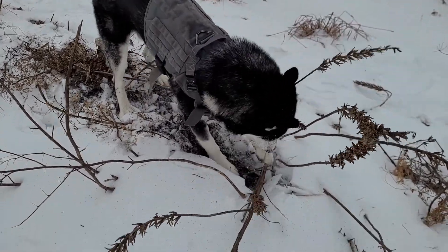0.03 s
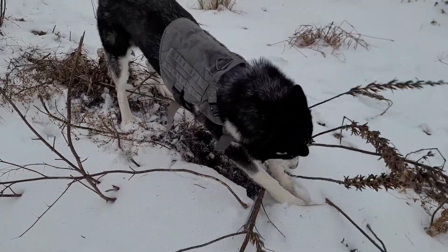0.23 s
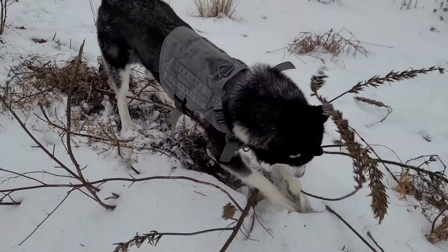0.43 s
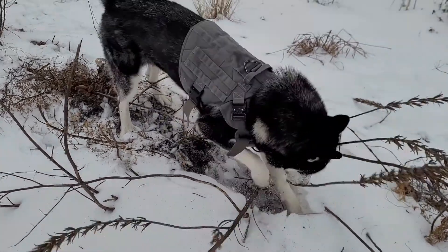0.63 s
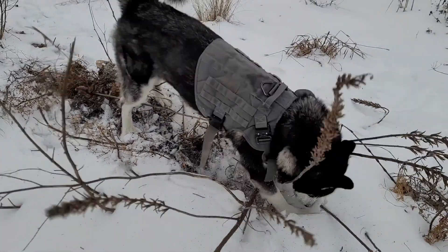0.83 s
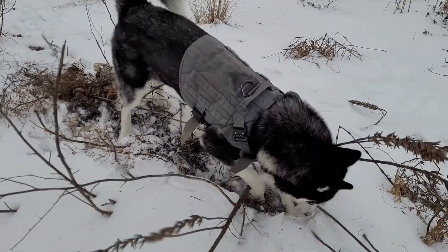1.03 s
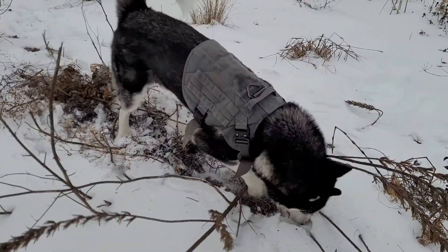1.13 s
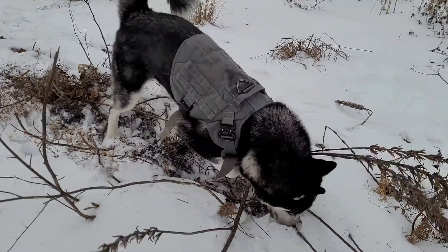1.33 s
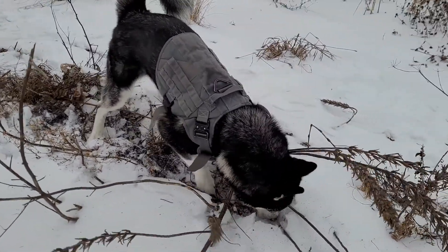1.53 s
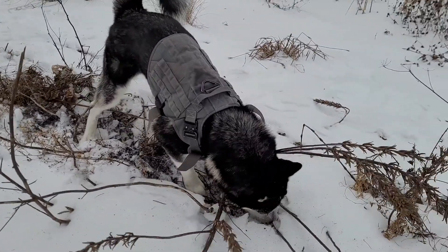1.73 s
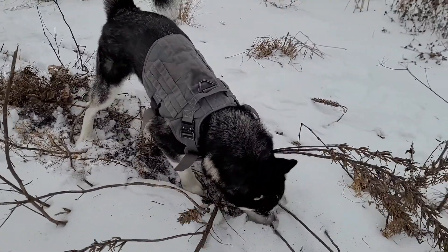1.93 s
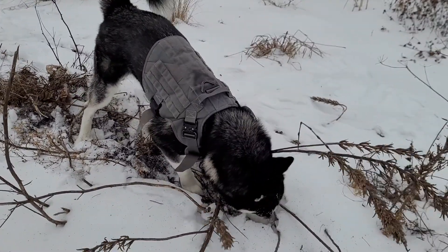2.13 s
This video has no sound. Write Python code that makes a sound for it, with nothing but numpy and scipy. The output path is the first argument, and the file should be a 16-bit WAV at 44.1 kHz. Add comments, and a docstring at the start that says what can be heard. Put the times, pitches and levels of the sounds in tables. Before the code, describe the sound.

Crisp, icy crunching comes in uneven bursts as a dog paws at snow outdoors, heard up close. Dry stems crack and paws thump dully, before it fades to a few quiet rustles above a low background rumble.

```python
"""Close, icy crunching: a dog in a padded coat digs and roots in crusted snow among dry stems.
Each paw stroke fractures a swarm of ice grains and compacts the snow beneath. Stems crack, lumps of
crust collapse, and the paws thud as their impacts excite damped vibrations in the snow and ground.
The digging dies down to soft nosing over a low, distant outdoor rumble."""
import sys
import numpy as np
from scipy import signal
from scipy.fft import rfft, irfft, next_fast_len
from scipy.io import wavfile

SR = 44100
rng = np.random.default_rng(int(sys.argv[2]) if len(sys.argv) > 2 else 0)


def wrap_up_sound(samples):
    """Save the sound to the file named by the first command line argument, as 16-bit audio."""
    columns = np.atleast_2d(samples).T
    # keep every value between -1 and 1, then stretch to whole-number steps
    tamed = np.clip(columns, -1, 1)
    steps = np.round(tamed * 32767).astype(np.int16)
    wavfile.write(sys.argv[1], SR, steps)


N = 97020

# Each row: time in seconds, relative level of the crunch in dB, relative level of the icy treble in dB.
DIG_EFFORT = [(0, -73, -62), (0.087, -74.5, -72), (0.117, -63.5, -52.5), (0.134, -49.5, -42),
              (0.218, -50.5, -45.5), (0.337, -53, -45), (0.36, -62.5, -62), (0.405, -64, -57),
              (0.43, -50, -44), (0.452, -53.5, -53), (0.465, -45.5, -41), (0.499, -46, -41),
              (0.539, -41, -34), (0.6, -53, -46.5), (0.665, -56, -52), (0.729, -44, -40.5),
              (0.788, -48.5, -43.5), (0.901, -58, -52), (0.947, -62, -57), (0.965, -52, -48.5),
              (1.004, -55, -49), (1.035, -39, -34), (1.075, -47.5, -42.5), (1.14, -60.5, -50),
              (1.246, -59.5, -53), (1.272, -62.5, -57.5), (1.41, -61.5, -56.5), (1.48, -71, -65.5),
              (1.532, -68, -60), (1.608, -65, -62.5), (1.665, -76.5, -70), (1.71, -88, -74.5),
              (1.928, -93, -82), (1.965, -66.5, -58), (2.001, -67.5, -54.5), (2.08, -76, -77),
              (2.138, -86.5, -70), (2.2, -101.5, -86.5)]
# Spectra of crust, ice, packing snow and ground. Each row: frequency in Hz, relative gain in dB.
CRUST_SPECTRUM = [(300, -24.5), (650, -7), (1100, -0.5), (1800, -4), (2700, -3), (3700, -5.5), (4700, -2),
                  (6200, -4), (9000, -25.5)]
ICE_SPECTRUM = [(3000, -33), (5000, -6.5), (6300, -2), (7700, -3.5), (8900, -8), (10200, -3.5), (11700, 1),
                (13700, 1), (15500, 1)]
PACK_SPECTRUM = [(70, -16.5), (120, -5.5), (165, -9.5), (220, 4.5), (350, 0.5), (520, 0.5), (780, -7.5),
                 (1200, -12), (2500, -33)]
GROUND_SPECTRUM = [(20, -41.5), (38, -9.5), (56, 3), (85, -2.5), (120, -1.5), (200, -17.5), (600, -54.5)]
def digging(grains_per_s=2000, grains_follow=.35, pack_follows=.74, ground_follows=.33):
    """Brittle fracture of the crust gives the crackle; compaction and ground vibration give the body."""
    times, *levels = np.transpose(DIG_EFFORT)
    crunch_db, ice_db = [np.interp(seconds(), times, level) for level in levels]
    rate = grains_per_s * from_db(grains_follow * (ice_db - ice_db.mean()))  # more force, more grains
    crust = grains(rate, spread_db=2, grain_s=.00067, clump_db=2.94, clumps_per_s=200, bed=.3, alike=.25)
    packing = grains(700, spread_db=1.5, grain_s=.0018, clump_db=2, clumps_per_s=76, bed=.3, alike=.95)
    crunch = from_db(5 + crunch_db) * shaped(crust, CRUST_SPECTRUM)
    ice = from_db(4 + ice_db) * shaped(crust, ICE_SPECTRUM)
    # Snow and ground follow only a share of the crunch's swing in level.
    snow = from_db(-10.5 + pack_follows * crunch_db) * shaped(packing, PACK_SPECTRUM)
    ground = from_db(-37 + ground_follows * crunch_db) * shaped(noise(.97), GROUND_SPECTRUM)
    return crunch + ice, snow + ground


# Each row: start in seconds, relative level in dB, offset of the woody midrange in dB.
STEM_BREAKS = [(0.1689, -27, 2), (0.189, -25, -9), (0.211, -21, -33), (0.223, -26.5, -2.5),
               (0.3424, -28.5, -2), (0.3716, -23, -8.5), (0.4406, -17, -37), (0.4548, -12, -15),
               (0.735, -19, -6.5), (0.7657, -20.5, -10), (1.0654, -10.5, -12), (1.175, -22.5, -45),
               (1.2275, -28, -17), (1.506, -32, -32), (2.037, -39.5, -26)]
# Spectra of the bright crack and the woody midrange. Each row: frequency in Hz, relative gain in dB.
CRACK_SPECTRUM = [(800, -34), (2500, -15), (5000, -1.5), (8000, -10), (11500, 4), (15500, 0)]
WOOD_SPECTRUM = [(400, -7), (900, -1.5), (1500, -3), (2000, -4), (2800, 1.5), (3600, -5.5), (4900, -2.5),
                 (8000, -16.5)]
def stem_snaps(delay_s=.0013, splinter_decay_s=.0006, splinter_db=-6):
    """Sudden release of bending stress: a dry stem radiates one impulse and a spray of splinters."""
    bright, woody = np.zeros((2, 2, N))
    age = np.arange(SR // 50) / SR
    for start, db, wood_db in STEM_BREAKS:
        crack = rng.standard_normal((2, len(age))) * np.exp(-age / splinter_decay_s)
        crack *= from_db(splinter_db) / np.linalg.norm(crack[0])
        crack[:, 0] += [1, .5]  # the impulse faces the left microphone
        i = int((start + delay_s) * SR)
        bright[:, i:i + len(age)] += from_db(db + 9) * crack
        woody[:, i:i + len(age)] += from_db(db + wood_db + 11) * crack
    return shaped(bright, CRACK_SPECTRUM) + shaped(woody, WOOD_SPECTRUM)


# Each row is a lump of crust collapsing or a dull knock or crack of a woody stem. Each row: start in seconds,
# relative level in dB, offset of the woody midrange in dB, width in seconds.
CRACK_RUNS = [(0.1223, -27.5, -9, 0.0053), (0.5315, -18, -16, 0.0049), (0.959, -40, -7.5, 0.0035),
              (1.0211, -18.5, -15.5, 0.0041), (1.0373, -14.5, -19, 0.0045), (1.0455, -20, -14, 0.0046),
              (1.0574, -11, -15.5, 0.0036), (1.383, -28.5, -19.5, 0.0037), (1.45, -38, -17.5, 0.0038),
              (1.5185, -26, -29, 0.0041), (1.5268, -32.5, -22, 0.006)]
def crack_runs():
    """Cascading fracture: a lump of crust gives way, or a woody stem knocks and cracks, in a run of cracks that
    swells and dies quickly."""
    bright, woody = np.zeros((2, N))
    for start, db, wood_db, width in CRACK_RUNS:
        rise = np.maximum(seconds() - start, 0) / (width / 2)
        swell = rise ** 2 * np.exp(2 * (1 - rise))  # peaks half a width after the start
        bright += from_db(db - 6.5) * swell
        woody += from_db(db + wood_db + 6.5) * swell
    run = grains(6500, spread_db=4, grain_s=.00024, clump_db=3.5, clumps_per_s=500, bed=.2, alike=.81)
    return shaped(bright * run, ICE_SPECTRUM) + shaped(woody * run, WOOD_SPECTRUM)


# Each row: start in seconds, relative level in dB, pitch in Hz.
PAW_STRIKES = [(0.209, -26, 493), (0.22, -26, 245), (0.284, -26, 556), (0.461, -32, 246), (0.479, -24, 247),
               (0.509, -27.5, 221), (0.542, -23, 358), (0.582, -33.5, 275), (0.73, -32, 288),
               (0.761, -23.5, 474), (0.956, -35, 291), (1.021, -23, 817), (1.034, -18.5, 444),
               (1.045, -16, 509), (1.102, -29, 366), (1.224, -39.5, 272), (1.378, -32, 711)]
def paw_thuds(t60_cycles=17.72, rise_s=.0019, grit_db=-6):
    """Damped resonance: each paw sets the packed snow ringing for a few gritty cycles."""
    out, hiss = np.zeros((2, N)), noise(.87)
    for start, db, hz in PAW_STRIKES:
        age = np.maximum(seconds() - start, 0)
        attack = 1 - np.exp(-(age / rise_s) ** 2)
        decay = from_db(db - 2.5 - 60 * age * hz / t60_cycles)
        band = signal.butter(2, [.71 * hz, 2.13 * hz], "band", fs=SR, output="sos")
        grit = from_db(grit_db) * rms_one(signal.sosfilt(band, hiss))
        out += attack * decay * (np.sin(2 * np.pi * hz * age) + grit)
    return out


# Each row: start in seconds, level in dB, pitch in Hz.
WEIGHT_LANDINGS = [(0.953, -44.5, 60), (1.024, -33.5, 110), (1.066, -37.5, 52), (1.521, -57, 58),
                   (2.081, -46.5, 57)]
def stomps(t60_s=.14):
    """Impact excitation: the dog's weight lands and starts a deep, exponentially decaying tone."""
    out = np.zeros(N)
    for start, db, hz in WEIGHT_LANDINGS:
        age = np.maximum(seconds() - start, 0)
        out += from_db(db - 60 * age / t60_s) * np.sin(2 * np.pi * hz * age)
    return out


def scatter(x, decay_s=.012, level_db=-11):
    """Diffuse reflection: snow and brush return a faint, very short tail."""
    age = np.arange(SR // 10) / SR
    tail = rng.standard_normal((2, len(age))) * np.exp(-age / decay_s)
    return from_db(level_db) * signal.fftconvolve(x, tail / np.linalg.norm(tail[0]), axes=1)[:, :N]


# Each row: frequency in Hz, relative gain in dB.
RUMBLE_SPECTRUM = [(20, -23.5), (38, -16), (54, 5.5), (85, -10), (115, -5.5), (190, -14), (350, -8.5),
                   (480, -10), (750, -20), (1300, -42), (2000, -55.5), (15000, -43.5)]
def distant_rumble():
    """Stationary noise with its power at low frequencies is heard as a steady rumble."""
    return from_db(-58.5) * shaped(noise(.53), RUMBLE_SPECTRUM)


def grains(per_s, spread_db, grain_s, clump_db, clumps_per_s, bed, alike):
    """Shot noise: tiny random fractures, each a dying burst, add in energy over a bed of friction."""
    sizes = from_db(spread_db * np.minimum(rng.exponential(1, N), 3.5) + clump_db * drift(clumps_per_s))
    born = rng.random(N) < per_s / SR
    retained = np.exp(-2 / (grain_s * SR))
    energy = signal.lfilter([1], [1, -retained], born * sizes ** 2 / per_s + 1e-18)
    return rms_one(np.sqrt(energy / energy.mean() + bed) * noise(alike))


def shaped(x, points, level=True):
    """Minimum-phase filter through (Hz, dB) points; with level, white noise keeps its power."""
    size = next_fast_len(2 * N)
    hz, db = np.transpose(points)
    bin_hz = np.arange(size // 2 + 1) * SR / size
    gain = from_db(np.interp(np.log(bin_hz + 1), np.log(hz), db))
    cepstrum = irfft(np.log(rms_one(gain) if level else gain), size)
    cepstrum[1:size // 2] *= 2  # folding the cepstrum makes the filter causal
    cepstrum[size // 2 + 1:] = 0
    return irfft(rfft(x, size) * np.exp(rfft(cepstrum)), size)[..., :N]


def noise(alike):
    """Partial coherence: stereo white noise whose left-right correlation is alike."""
    return np.sqrt(alike) * rng.standard_normal(N) + np.sqrt(1 - alike) * rng.standard_normal((2, N))


def drift(per_s):
    """Random modulation of unit RMS, interpolated between per_s values a second."""
    return rms_one(np.interp(seconds() * per_s, np.arange(4096), rng.standard_normal(4096)))


def from_db(db):
    """Amplitude ratio of a level in decibels."""
    return 10 ** (np.asarray(db) / 20)


def rms_one(x):
    """Normalisation to unit RMS."""
    return x / np.sqrt(np.mean(x ** 2) + 1e-20)


def seconds():
    """Time of every sample."""
    return np.arange(N) / SR


def scene(right_lag_s=.0004):
    """Superposition of the dog's work and the rumble; the crackle reaches the left microphone first."""
    crackle, body = digging()
    left, right = crackle + stem_snaps() + crack_runs()
    crackle = np.array([left, np.roll(right, int(right_lag_s * SR))])
    return crackle + scatter(crackle) + body + paw_thuds() + stomps() + distant_rumble()


# Each row: frequency in Hz, left level minus right level in dB.
STEREO_BALANCE = [(60, -2), (300, -2.5), (700, -4), (1200, -4), (1800, -6), (2800, 10), (5000, 8.5),
                  (8000, 15.5), (11500, 9.5), (15000, 8)]
def record(dry, cutoff_hz=15900):
    """Level difference between microphones: more treble left, more body right; both are low-passed."""
    left = shaped(dry[0], [(hz, db / 2) for hz, db in STEREO_BALANCE], level=False)
    right = shaped(dry[1], [(hz, -db / 2) for hz, db in STEREO_BALANCE], level=False)
    lowpass = signal.ellip(12, .2, 80, cutoff_hz, fs=SR, output="sos")
    return signal.sosfilt(lowpass, [left, right])


dry = scene()
out = record(dry)
wrap_up_sound(out)
```